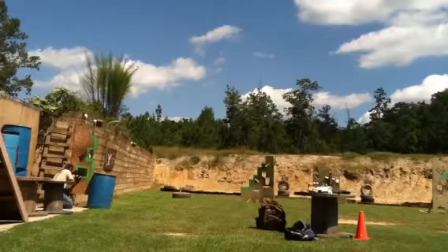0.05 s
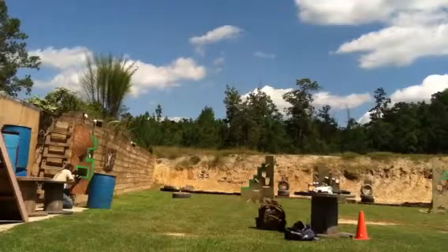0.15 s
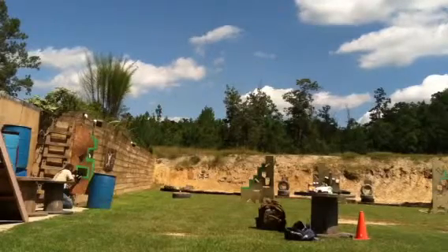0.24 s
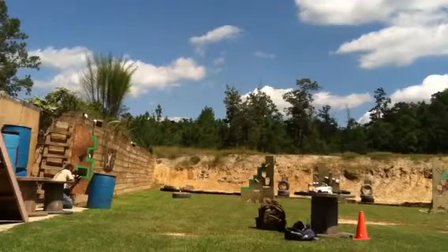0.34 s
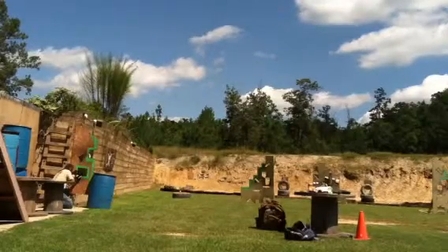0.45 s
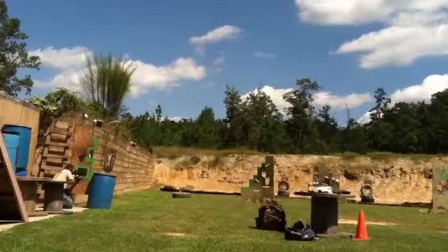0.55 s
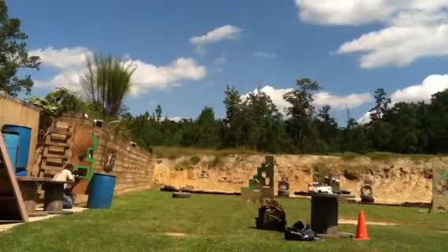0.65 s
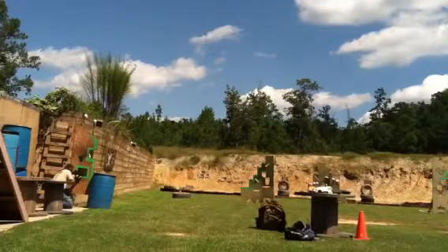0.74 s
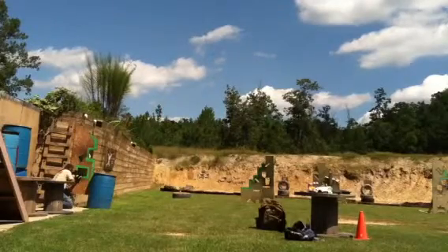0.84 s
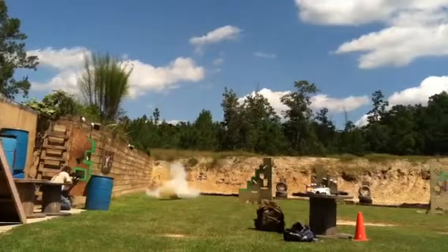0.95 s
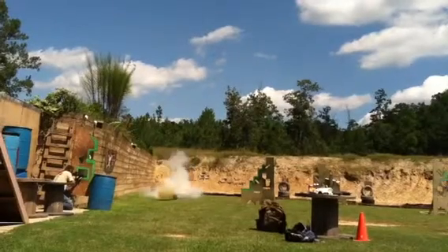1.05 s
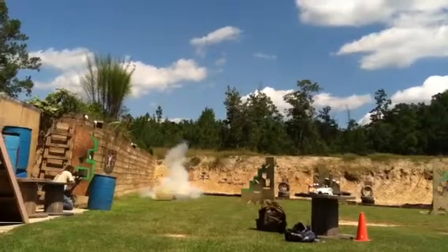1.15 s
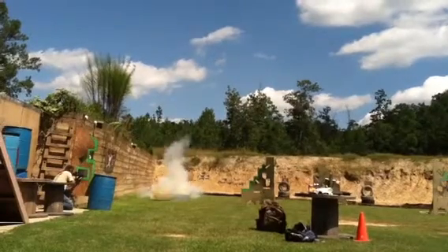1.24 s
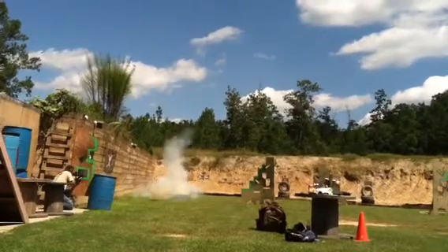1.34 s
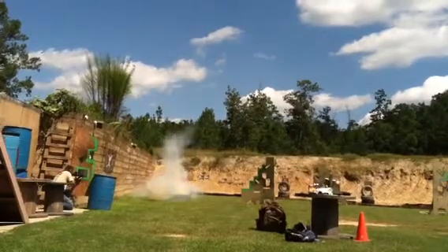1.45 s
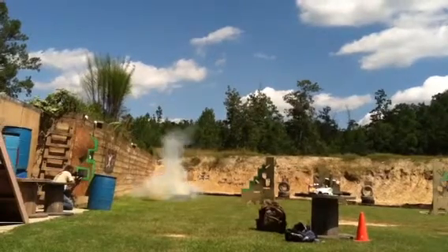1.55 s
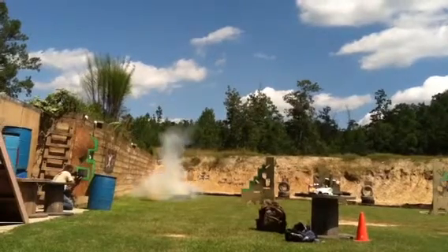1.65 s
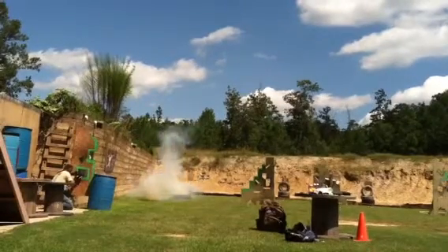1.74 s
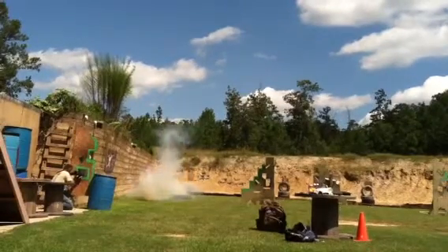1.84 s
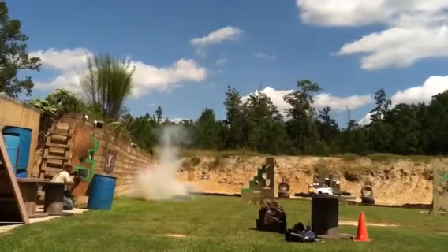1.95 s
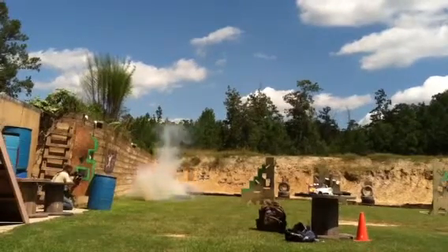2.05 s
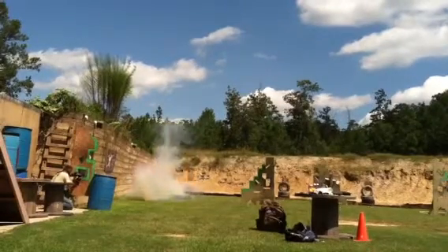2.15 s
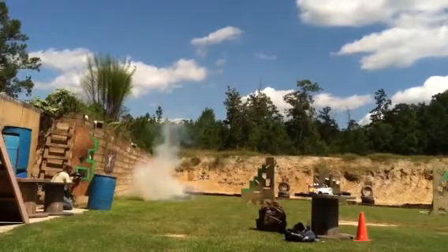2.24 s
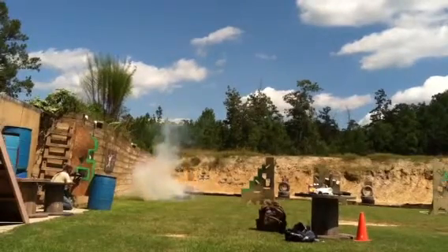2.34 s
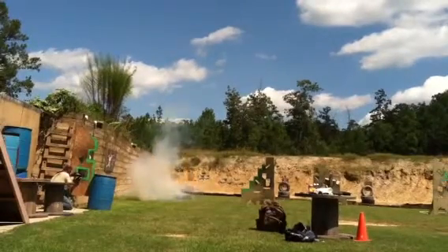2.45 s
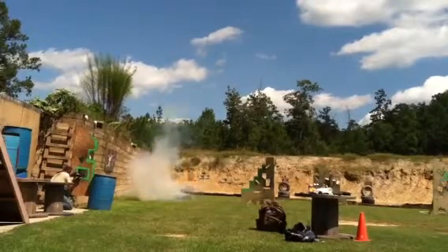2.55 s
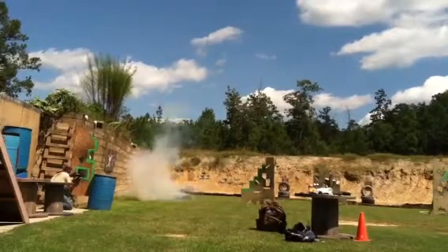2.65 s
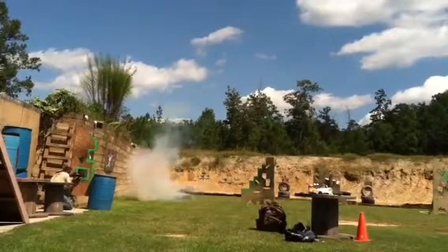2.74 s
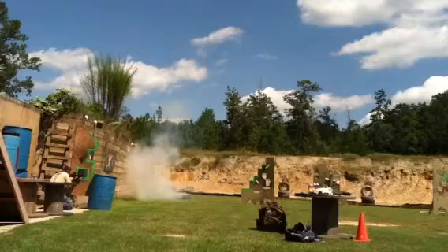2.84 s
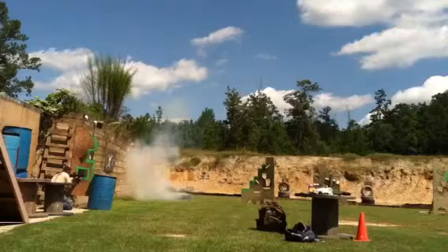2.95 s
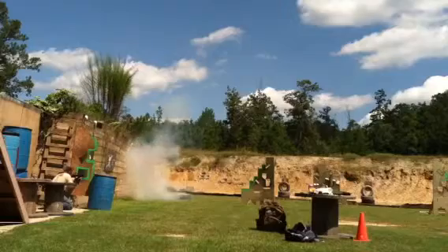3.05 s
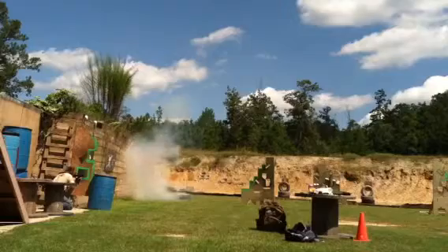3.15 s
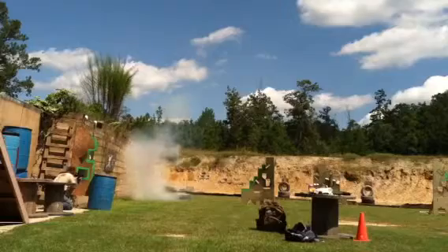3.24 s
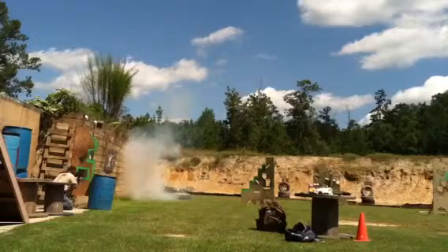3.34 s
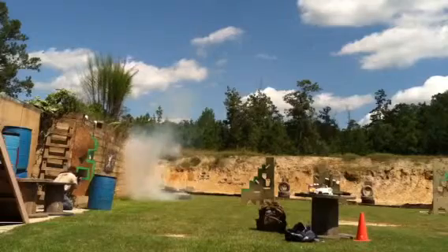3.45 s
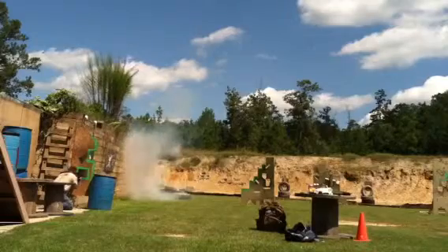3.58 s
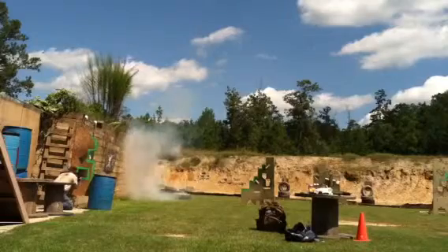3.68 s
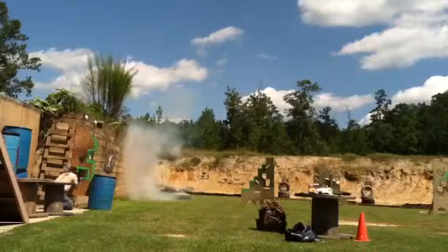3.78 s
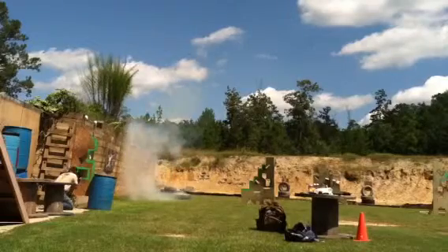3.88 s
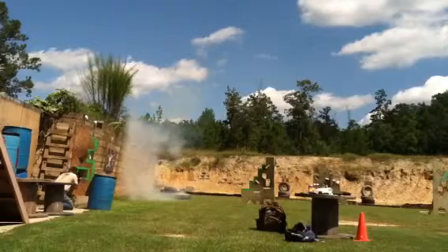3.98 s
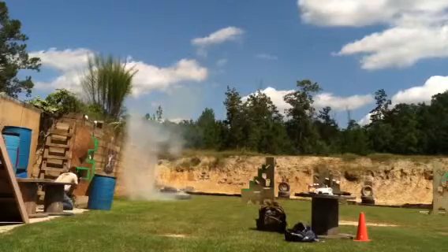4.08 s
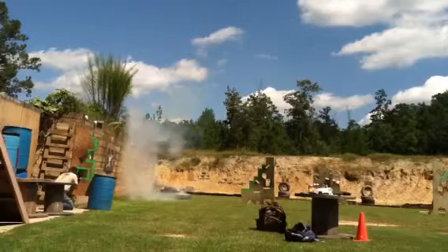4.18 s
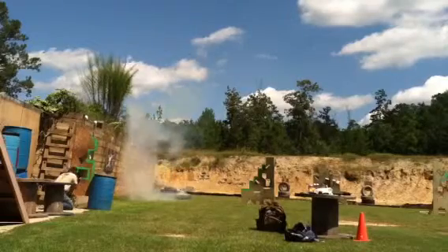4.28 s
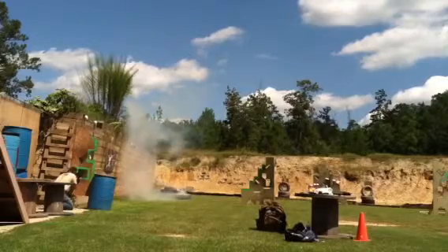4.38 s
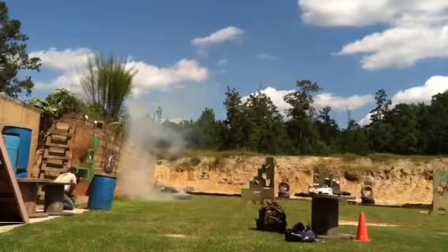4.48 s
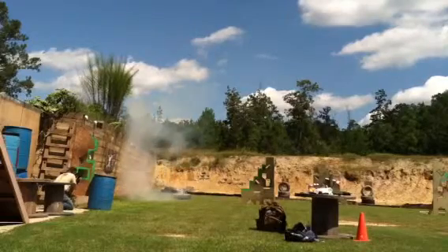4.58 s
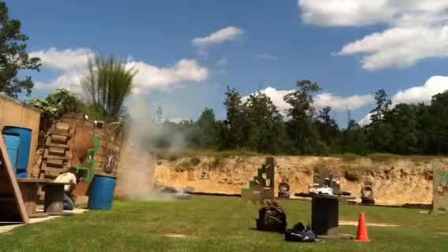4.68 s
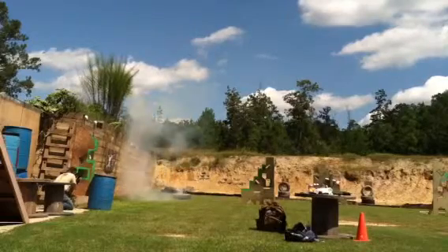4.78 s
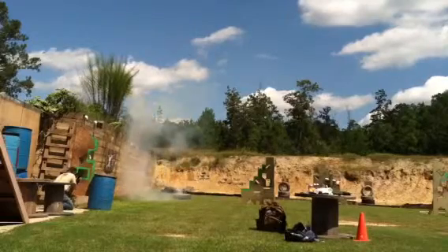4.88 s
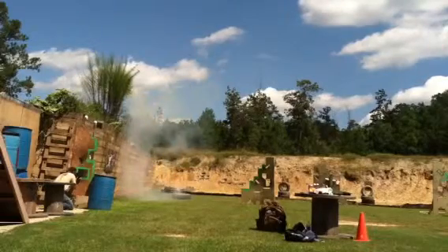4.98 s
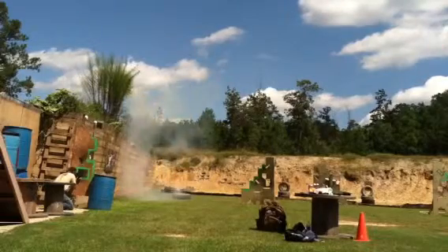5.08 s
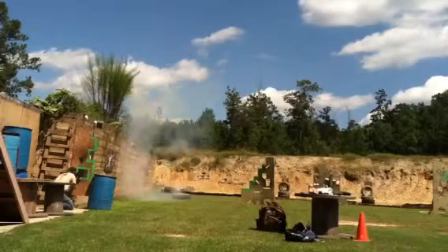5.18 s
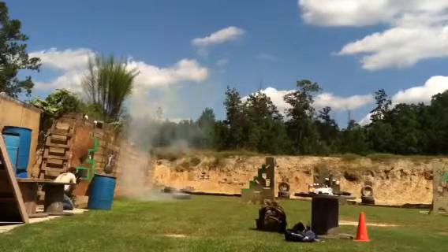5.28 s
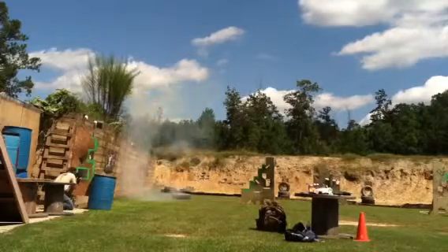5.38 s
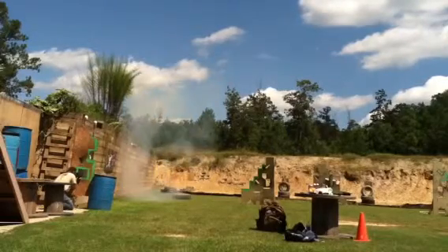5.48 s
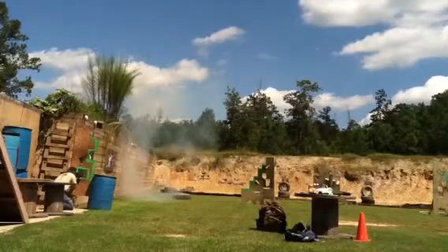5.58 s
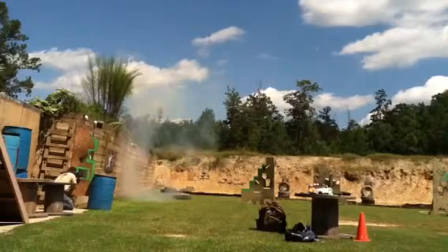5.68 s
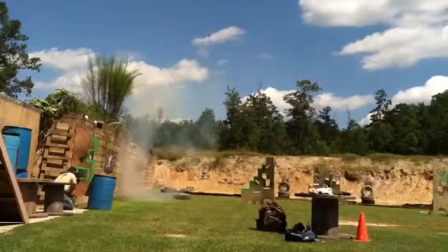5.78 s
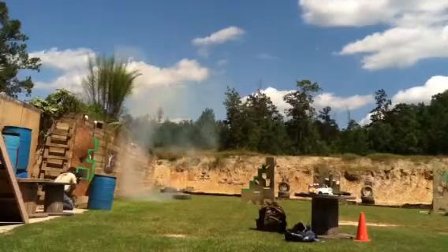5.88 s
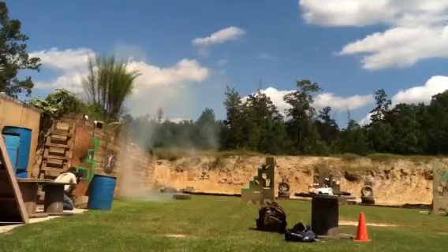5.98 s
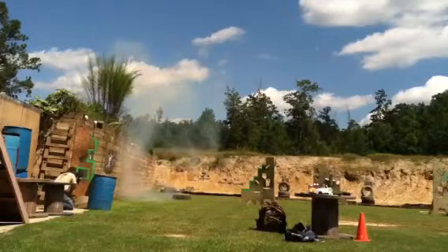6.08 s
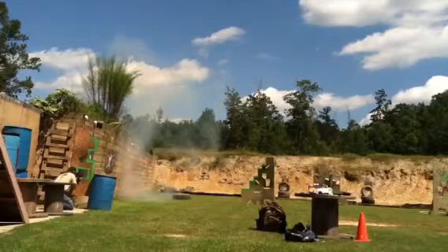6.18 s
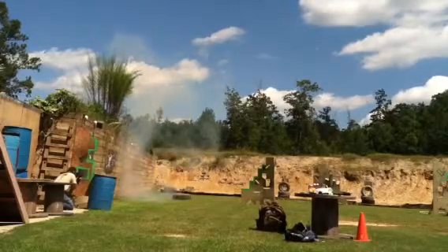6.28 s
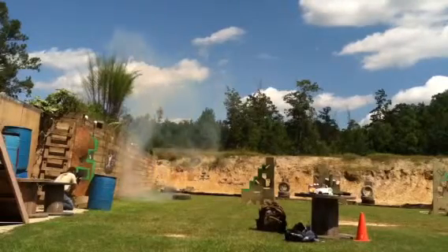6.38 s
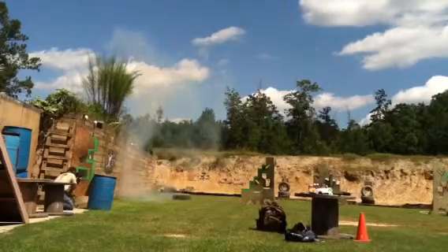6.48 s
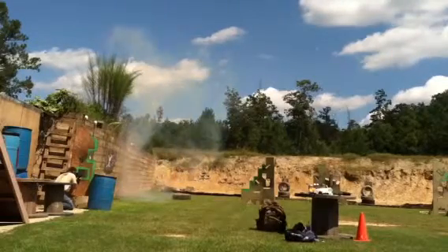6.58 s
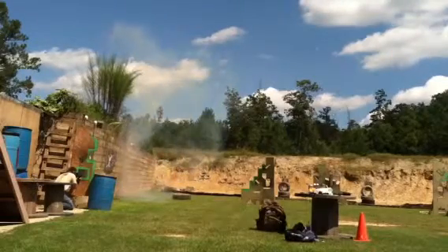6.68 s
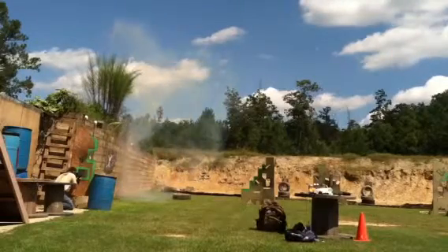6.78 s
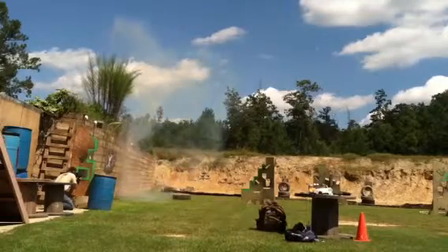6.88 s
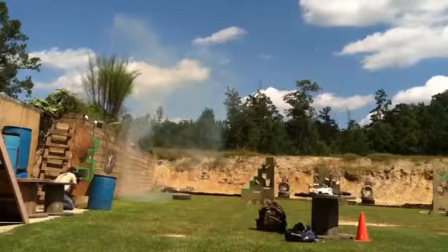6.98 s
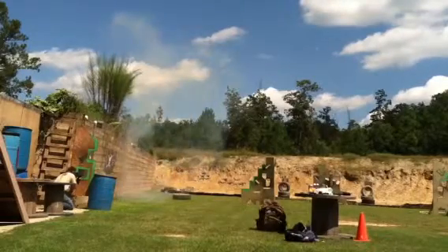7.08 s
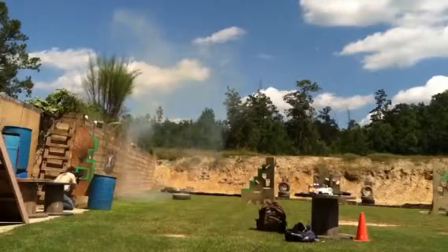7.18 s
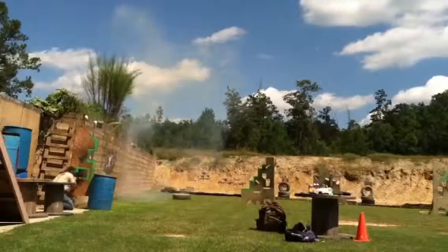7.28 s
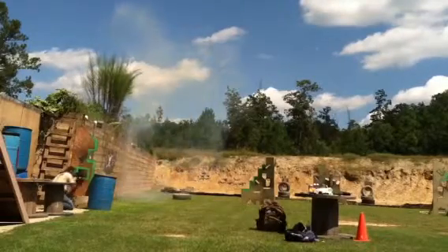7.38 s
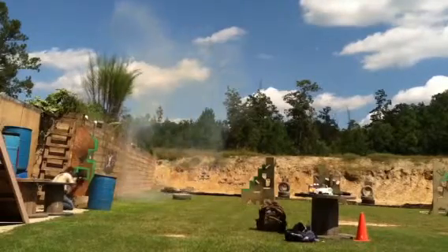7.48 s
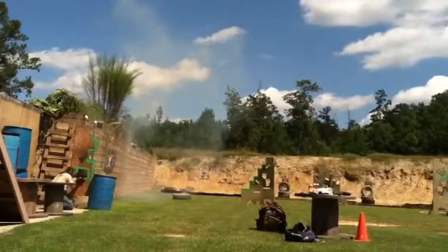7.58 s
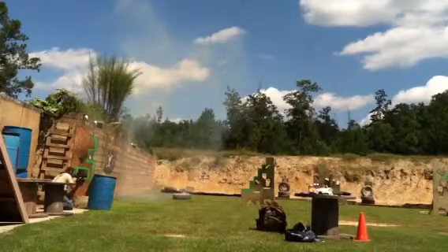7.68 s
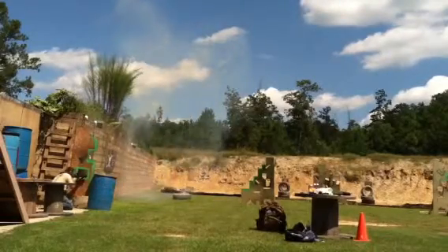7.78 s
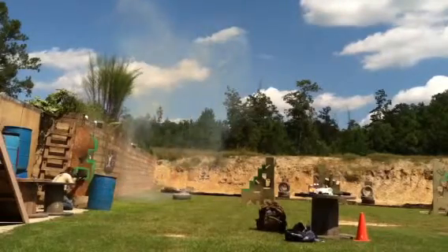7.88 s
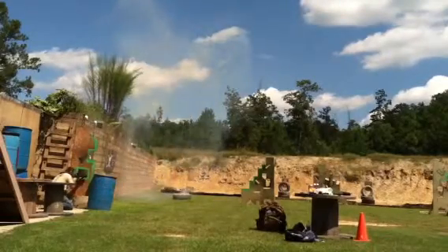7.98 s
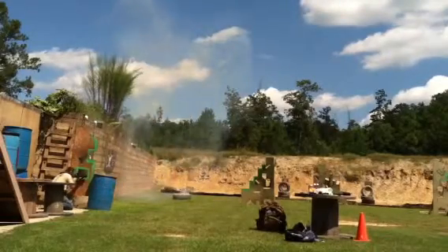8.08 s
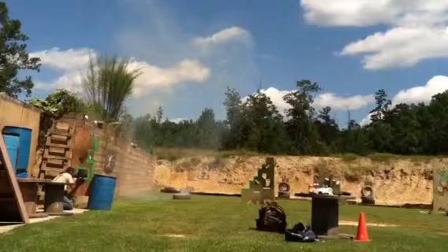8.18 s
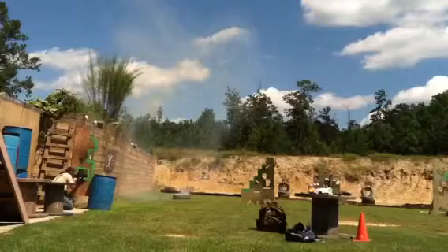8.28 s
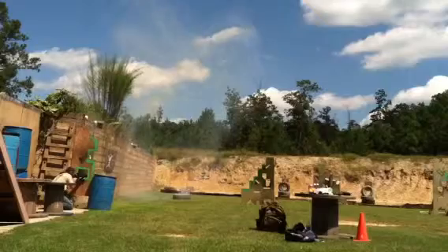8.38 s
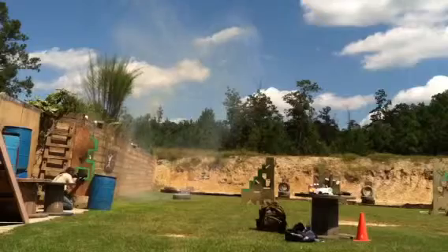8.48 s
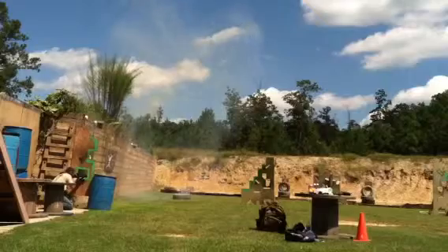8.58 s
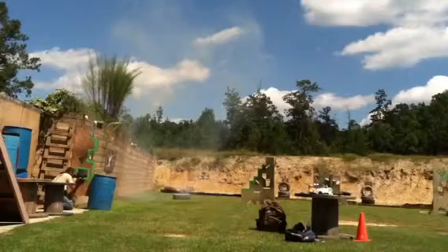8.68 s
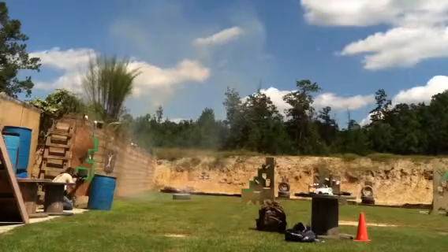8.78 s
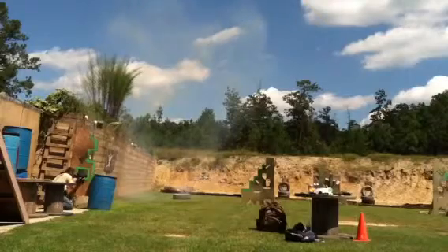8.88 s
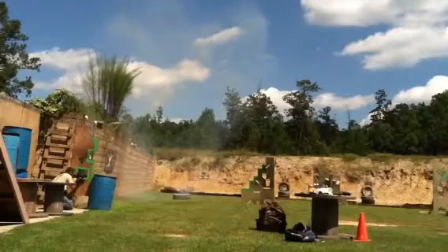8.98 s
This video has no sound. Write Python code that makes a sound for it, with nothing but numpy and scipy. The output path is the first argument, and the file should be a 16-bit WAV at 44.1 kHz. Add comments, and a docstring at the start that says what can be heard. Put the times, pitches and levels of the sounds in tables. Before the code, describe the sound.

Outdoors, a rifle crack instantly sets off a booming explosion with a long rolling echo, then five spaced gunshots ring out over faint insects.

```python
"""Gunfire between earth banks

An outdoor range with a forest behind. A rifle shot sets off an explosive charge downrange; later come
five more shots, the last two from another spot. Banks and trees return every bang as shaped noise in waves.
Insects pulse as swelling bands of noise, far machinery hums in narrow bands, small debris ticks and rustles
in ringing bursts. The small microphone overloads on each bang."""
import sys
import numpy as np
from scipy import signal
from scipy.fft import rfft, irfft, next_fast_len
from scipy.io import wavfile
from scipy.ndimage import uniform_filter1d, map_coordinates

SR = 44100
rng = np.random.default_rng(int(sys.argv[2]) if len(sys.argv) > 2 else 0)


def int16_out(signal):
    """Quantize to a 16-bit WAV file."""
    q = np.round(np.clip(np.atleast_2d(signal).T, -1, 1) * 32767)
    wavfile.write(sys.argv[1], SR, q.astype(np.int16))


def nominal_scale(level):
    """Amplitude ratio for a level in decibels (scalar or array-like)."""
    x = np.asarray(level, float) / 20
    return 10 ** x


N = 398223  # length in samples, about 9 s


def unit(x):
    """Scaled to rms 1."""
    return x / np.sqrt(np.mean(x ** 2, axis=-1, keepdims=True) + 1e-20)


def filtered(x, response):
    """x times a response of frequency."""
    size = next_fast_len(x.shape[-1] + 8192)
    spectrum = rfft(x, size) * response(np.fft.rfftfreq(size, 1 / SR))
    return irfft(spectrum, size)[..., :x.shape[-1]]


def colour(points):
    """Response through (f/Hz, level/dB) points on a log frequency axis."""
    hz, db = np.transpose(points)
    return lambda f: nominal_scale(np.interp(np.log(f + 1), np.log(hz), db))


def resonance(hz, width):
    """Response of one resonator, gain 1 at its centre."""
    return lambda f: 1j * f * width / (hz * hz - f * f + 1j * f * width)


def ringing_noise(length, hz, width):
    """White noise through two equal resonators in a row."""
    return filtered(rng.standard_normal(length), lambda f: resonance(hz, width)(f) ** 2)


def evened(x, span, share):
    """Noise with a share of its own swells over span seconds divided out, at rms 1."""
    power = np.abs(uniform_filter1d(x ** 2, round(span * SR)) + 1e-9)
    return unit(x / power ** (share / 2))


def wander(length, rate):
    """A smooth random curve, rate knots a second."""
    knots = rng.standard_normal(int(length * rate / SR) + 4)
    return map_coordinates(knots, [np.arange(length) * rate / SR])


# Far machinery hums: centre f/Hz, width f/Hz of each of two resonators, level/dB
MACHINERY = [(123, 21, -64), (200, 15, -65.5), (361.1, 9.2, -66), (1310, 20, -79)]
# Colour of the open-air hush: f/Hz, relative level/dB per Hz
HUSH = [(30, -17.5), (85, -12), (150, -2.5), (300, -5), (600, -13), (1300, -15.5), (2500, -19.5),
        (8000, -26.5), (13000, -41), (16000, -42.5)]


def background():
    """Far machinery as narrow, fairly steady bands of noise over a broad hush."""
    hush = nominal_scale(-62.5) * unit(filtered(rng.standard_normal(N), colour(HUSH)))
    hums = 0
    for hz, width, db in MACHINERY:
        hums = hums + nominal_scale(db) * evened(ringing_noise(N, hz, width), span=.05, share=0.76)
    return hums + hush


# Loudness of the whole insect chorus at the microphone: t/s, level/dB
CHORUS_LEVEL = [(0, -78), (2, -82.5), (3.3, -68.5), (4, -66.5), (4.6, -62.5), (5.2, -65.5), (7.5, -73),
                (9.03, -70)]
# Bands of the chorus: centre f/Hz, width f/Hz of each of two resonators, relative level/dB, swell level/dB up and down
CHORUS_BANDS = [(4180, 210, -5, 6), (5900, 480, -5.5, 2.8), (6300, 540, -5, 3), (7100, 750, -1.5, 2),
                (5430, 4100, -1, 2)]


def insects():
    """A chorus buzzing in a few bands, each swelling about eight times a second, not quite in step."""
    swell_hz, swell_zero_s = 7.9, 4.39
    t = np.arange(N) / SR
    buzz = 0
    for hz, width, db, depth_db in CHORUS_BANDS:
        phase = 2 * np.pi * swell_hz * (t - swell_zero_s) + .4 * wander(N, 3)
        swell_db = depth_db * np.sin(phase) + 1.2 * wander(N, 4)
        buzz = buzz + nominal_scale(db + swell_db) * unit(ringing_noise(N, hz, width))
    return unit(buzz) * nominal_scale(np.interp(t, *np.transpose(CHORUS_LEVEL)))


def knocks(events, width_share, attack):
    """Dying bursts of noise, each ringing around its own centre; attack in seconds."""
    out, t = np.zeros(N + SR), np.arange(SR // 3) / SR
    for s, db, hz, t60 in events:
        burst = unit(ringing_noise(len(t), hz, width_share * hz))
        below_peak_db = 5.5  # burst rms lies under its nominal peak
        envelope = nominal_scale(db - below_peak_db - 60 * t / t60) * (1 - np.exp(-t / attack))
        out[round(s * SR):][:len(t)] += envelope * burst
    return out[:N]


def patter(count):
    """Rows for faint bits of debris landing at random times, levels and pitches."""
    from_s, to_s, faintest_db = 1.8, 3.4, -66
    when, size, pitch = rng.random((count, 3)).T
    centre_hz = 2800 * 3.2 ** pitch
    return zip(from_s + (to_s - from_s) * when, faintest_db + 5 * size, centre_hz, np.full(count, .05))


# Light ticks and longer, soft rustles of debris: t/s, nominal peak level/dB, centre f/Hz, fall by 60 dB t/s
DEBRIS_TICKS_AND_RUSTLES = [(2.195, -58, 6500, .03), (2.21, -54, 8000, .02), (2.62, -56, 3530, 0.4),
                            (2.67, -53, 3480, 0.27), (2.72, -56, 4000, 0.29), (2.748, -52, 9500, .02),
                            (3.050, -40, 5700, .02), (3.054, -39.5, 3400, 0.054),
                            (3.066, -35.5, 4500, 0.032), (3.080, -47, 4000, 0.09), (3.435, -55, 8050, .03),
                            (3.774, -51, 7000, 0.036), (3.778, -51, 3600, .04), (4.13, -57, 3500, 0.34),
                            (4.38, -54, 3000, 0.1), (4.395, -56, 3200, 0.11)]
# Dull far thuds: t/s, nominal peak level/dB, centre f/Hz, fall by 60 dB t/s
FAR_THUDS = [(3.122, -34, 552, 0.06), (3.778, -38, 560, 0.07), (3.793, -40, 272, 0.096),
             (3.819, -37, 294, 0.065), (4.183, -35, 530, 0.06), (4.197, -40, 557, 0.069),
             (5.03, -37, 315, 0.071), (5.054, -40, 500, 0.076)]


def debris():
    """Ticks and rustles ring broadly with a sharp start, far thuds ring narrower with a softer one."""
    light = knocks([*DEBRIS_TICKS_AND_RUSTLES, *patter(count=10)], width_share=0.77, attack=0.00041)
    thuds = knocks(FAR_THUDS, width_share=0.38, attack=0.0032)
    return light + thuds


# From the second spot a stepped timber wall returns a falling tone: delay t/s, pitch f/Hz, level/dB
TIMBER_STEPS = [(0.059, 652, -38), (0.077, 563.3, -15.5), (.1, 402, -24), (0.122, 285.5, -13.5),
                (.14, 215, -21), (0.191, 171, -27), (.23, 149, -47)]


def stepped_wall(t):
    """Steps answer one after another at widening intervals, which blurs into a wavering, sinking tone."""
    delay, hz, db = np.transpose(TIMBER_STEPS)
    pitch = np.interp(t, delay, hz)
    phase = 2 * np.pi * np.cumsum(pitch) / SR + 0.81 * wander(len(t), 71.3)
    level_db = np.interp(t, delay, db, left=-120, right=-120) + 2.0 * wander(len(t), 66.6)
    return nominal_scale(level_db) * np.sin(phase)


def returns(t, wash, delay, spread, db):
    """Level over time: two dying washes plus bell-shaped swells for the bang and its reflections."""
    near_db, near_t60, far_db, far_t60 = wash
    early = t[:SR * 3 // 4]  # the swells all lie here
    bells = nominal_scale(db)[:, None] ** 2 * np.exp(-((early - delay[:, None]) / spread[:, None]) ** 2)
    washes = nominal_scale(near_db - 60 * t / near_t60) ** 2 + nominal_scale(far_db - 60 * t / far_t60) ** 2
    swells = np.pad(bells.sum(axis=0), (0, len(t) - len(early)))
    return np.sqrt(washes + swells)


# The next four tables have one entry a place: 0 first firing spot, 1 second spot, 2 charge downrange.
# Low thumps, first the bang itself, then returns from the earth banks: delay t/s, spread t/s, boom level/dB
BANK_THUMPS = [
    [(.008, .015, -14.5), (.044, .007, -15.5), (.09, .03, -23), (.128, .011, -20), (.162, .006, -23),
     (.173, .004, -28), (.187, .007, -25.5), (.225, .015, -32), (.251, .012, -27), (.33, .04, -39),
     (.385, .02, -42), (.495, .007, -44)],
    [(.006, .013, -12.5), (.037, .01, -17.5), (.08, .01, -16), (.12, .018, -20.5), (.17, .012, -26.5),
     (.245, .015, -30), (.31, .04, -34)],
    [(.018, .014, -1.5), (.045, .012, -6.5), (.085, .02, -1.5), (.127, .009, -4.5), (.17, .014, -11.5),
     (.213, .011, -10), (.244, .011, -11.5), (.28, .024, -13.5), (.33, .017, -21.5), (.375, .014, -28),
     (.414, .008, -23)],
]
# Brighter swells, first the bang as a sharp spike and a wider burst, then returns from walls and trees:
# delay t/s, spread t/s, body level/dB, crack level/dB
BRIGHT_SWELLS = [
    [(.003, 0.0056, -9, -8), (.015, 0.0063, -14.5, -17.5), (.042, .006, -21, -33),
     (.12, 0.014, -25.5, -25.5), (.16, 0.019, -26.5, -25.5), (.258, 0.017, -29, -31),
     (.285, 0.016, -38, -32.5), (.325, 0.021, -29.5, -33), (.385, .025, -34, -38), (.48, 0.037, -36, -40.5)],
    [(.004, .005, -10, -10.5), (.017, .009, -16.5, -19.5), (.046, 0.0084, -18, -29.5),
     (.1, 0.025, -23.5, -22), (.158, 0.022, -27.5, -27.5), (.225, 0.022, -33, -30),
     (.28, 0.053, -32, -32.5), (.43, 0.051, -37.5, -39.5)],
    [(.007, 0.0034, -9.5, -9), (.022, .006, -14.5, -25), (.067, .006, -21.5, -22),
     (.115, 0.012, -23.5, -23.5), (.245, .04, -30.5, -29), (.3, .004, -17, -24), (.315, 0.0079, -22.5, -30),
     (.363, 0.0091, -27, -31), (.44, 0.048, -35.5, -33.5), (.5, 0.023, -29.5, -46)],
]
# Wash under them, rows for boom, body, crack: range wash level/dB, its fall by 60 dB t/s,
# forest roll level/dB, its fall by 60 dB t/s
RANGE_AND_FOREST_WASH = [
    [(-36, 0.72, -46.5, 5.1), (-20, 0.68, -30.5, 2.98), (-27.5, 1.5, -46, 4.5)],
    [(-20.5, 0.9, -40, 4.5), (-26.5, 1.72, -33, 3.45), (-26, 1.6, -51.5, 2.3)],
    [(-14, 1.4, -31, 6.49), (-21.5, 2.1, -33, 5.05), (-23.5, 1.8, -39.5, 2.7)],
]
# How long a bang and its returns last: t/s
BANG_LENGTH = [2, 1.5, 4.3]


def levels(place):
    """Boom, body and crack levels as the surfaces around one place answer a bang."""
    t = np.arange(round(BANG_LENGTH[place] * SR)) / SR
    delay, spread, body_db, crack_db = np.transpose(BRIGHT_SWELLS[place])
    boom_wash, body_wash, crack_wash = RANGE_AND_FOREST_WASH[place]
    boom = returns(t, boom_wash, *np.transpose(BANK_THUMPS[place]))
    body = returns(t, body_wash, delay, spread, body_db)
    crack = returns(t, crack_wash, delay, spread, crack_db)
    return boom, body, crack


def travelled(x, db_per_s, longest):
    """Treble lost in air and leaves grows with travel time (dB a second at 9.73 kHz); loudness is evened."""
    hz, at, z = signal.stft(x, SR, nperseg=256)
    loss = nominal_scale(-db_per_s * (hz[:, None] / 9730.0) ** 2 * np.minimum(at, longest))
    dulled = signal.istft(z * loss, SR, nperseg=256)[1][:len(x)]
    return evened(dulled, span=.03, share=1)


# Colour of the forest's late, broad roll: f/Hz, relative level/dB per Hz
FOREST_ROLL = [(30, -54), (70, -42), (120, -18.5), (180, -4), (260, 1.5), (350, -2.5), (500, -4.5),
               (650, -16.5), (800, -31), (1000, -85.5)]
# Colour of the middle of a bang, from any place: f/Hz, relative level/dB per Hz
BANG_BODY = [(200, -85.5), (400, -25), (600, -3.5), (1000, 3.5), (1700, 1.5), (2200, -5.5), (3000, -39.5),
             (5000, -87)]
# Colour of the bright top of a bang, from any place: f/Hz, relative level/dB per Hz
BANG_CRACK = [(900, -91), (1800, -12), (2500, 3), (4500, 2), (5500, -3.5), (8500, -7), (12000, -16),
              (16000, -30.5)]


def echoes(gains, boom_colour, scatter):
    """One bang and its returns from countless scattering surfaces, as noise in three bands."""
    t = np.arange(len(scatter)) / SR
    # the banks' resonant boom gives way to the forest's broader roll
    late = np.clip((t - .25) / 0.9, 0, 1)
    bank_boom = unit(filtered(scatter, colour(boom_colour)))
    forest_roll = unit(filtered(scatter, colour(FOREST_ROLL)))
    boom = evened((1 - late) * bank_boom + late * forest_roll, span=0.0075, share=0.62)
    body = travelled(filtered(scatter, colour(BANG_BODY)), db_per_s=86.0, longest=3.0)
    body = evened(body, span=0.012, share=0.28)
    crack = travelled(filtered(scatter, colour(BANG_CRACK)), db_per_s=35.5, longest=1.2)
    trunks = nominal_scale(0.33 * wander(len(t), 90))  # single trunks and posts stand out of the wash
    boom_gain, body_gain, crack_gain = gains
    return boom * boom_gain + body * trunks * body_gain + crack * trunks * crack_gain


# Bangs: t/s, place (0 first firing spot, 1 second spot, 2 charge downrange), strength level/dB,
# likeness to the other bangs from there (0-1)
SHOTS_AND_CHARGE = [(0.9223, 0, -2, 0.2), (.959, 2, -0.5, 1), (5.273, 0, -1, 0.8), (5.8597, 0, -0.5, .85),
                    (6.605, 0, -1, .85), (7.721, 1, -3, 0.7), (8.5348, 1, 0.5, .75)]
# Colour of the boom from the first firing spot: f/Hz, relative level/dB per Hz
FIRST_SPOT_BOOM = [(30, -61.5), (60, -38.5), (100, -23.5), (140, -8.5), (200, -2.5), (255, -0.5),
                   (320, -3.5), (400, -11), (520, -12), (700, -41.5), (1000, -95)]
# Colour of the boom from the second spot: f/Hz, relative level/dB per Hz
SECOND_SPOT_BOOM = [(30, -56), (60, -39), (100, -19), (140, -9), (200, -3), (260, 0), (320, 1.5),
                    (420, -3.5), (550, -4), (720, -21.5), (1000, -89.5)]
# Colour of the boom of the charge downrange: f/Hz, relative level/dB per Hz
DOWNRANGE_BOOM = [(30, -54), (60, -34), (100, -26.5), (145, -4), (210, -5), (258, 1.5), (285, -6.5),
                  (315, 0), (385, -23.5), (480, -11), (550, -14), (700, -36), (1000, -85.5)]
# Low push of the blast wave, one a place, relative to the bang's strength: level/dB
BLAST_PUSH = [-18, -15.5, -15.5]


def gunfire():
    """Bangs from one place meet the same surfaces; their echoes share a shape and are more or less alike
    in detail. A shock front and a low push open each."""
    booms = (FIRST_SPOT_BOOM, SECOND_SPOT_BOOM, DOWNRANGE_BOOM)
    gains = [levels(place) for place in range(3)]
    surfaces = [rng.standard_normal(len(boom_gain)) for boom_gain, _, _ in gains]
    out = np.zeros(N + 5 * SR)
    for s, place, db, alike in SHOTS_AND_CHARGE:
        same = surfaces[place]
        scatter = alike * same + np.sqrt(1 - alike ** 2) * rng.standard_normal(len(same))
        bang = echoes(gains[place], booms[place], scatter)
        t = np.arange(len(bang)) / SR
        far = np.clip(t / 0.35 - .6, 0, 1)
        bang = bang * nominal_scale(0.35 * wander(len(t), 12) * far)  # far returns roll in unevenly
        if place == 1:
            bang = bang + stepped_wall(t)
        front = 1.6 * (1 - t / 0.00059) * np.exp(-t / 0.0003)
        push = nominal_scale(BLAST_PUSH[place]) * np.sin(2 * np.pi * 30 * t) * np.exp(-t / .012)
        out[round(s * SR):][:len(t)] += nominal_scale(db) * (bang + front + push)
    return out[:N]


def scene():
    """Gunfire and small debris over the quiet of the range, in one channel."""
    return (background() + insects() + debris() + gunfire())[None]


def roll_off(x):
    """The treble ends steeply here."""
    return signal.sosfilt(signal.butter(12, 16500, fs=SR, output="sos"), x)


def record(dry):
    """The small microphone is deaf to deep bass, its input saturates on bangs; lowest bass and top treble roll off."""
    bass_hz, coupling_hz, edge_hz = 73, 28, 15300
    ceiling, hardness = .7, 8.8  # ceiling as a share of full scale
    thin = filtered(dry, lambda hz: (1j * hz / (bass_hz + 1j * hz)) ** 2)
    clipped = thin / (1 + np.abs(thin / ceiling) ** hardness) ** (1 / hardness)
    rolled = filtered(clipped, lambda hz: 1j * hz / (coupling_hz + 1j * hz) / np.sqrt(1 + (hz / edge_hz) ** 30))
    return roll_off(rolled)


dry = scene()
out = record(dry)
int16_out(out)
```